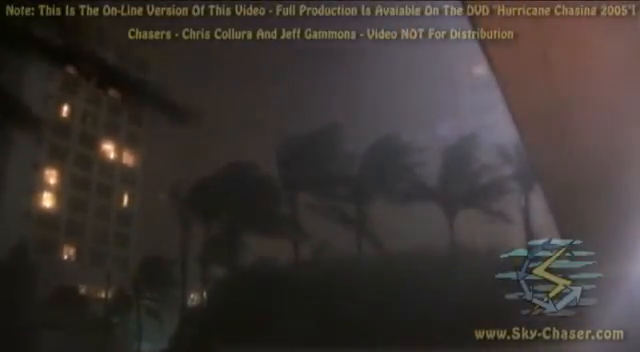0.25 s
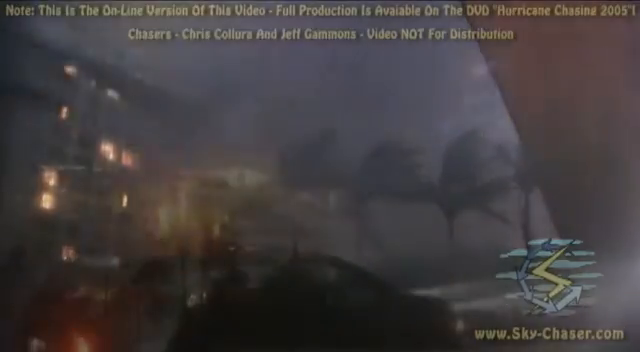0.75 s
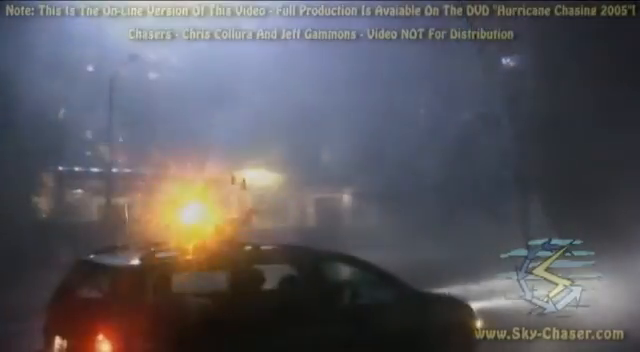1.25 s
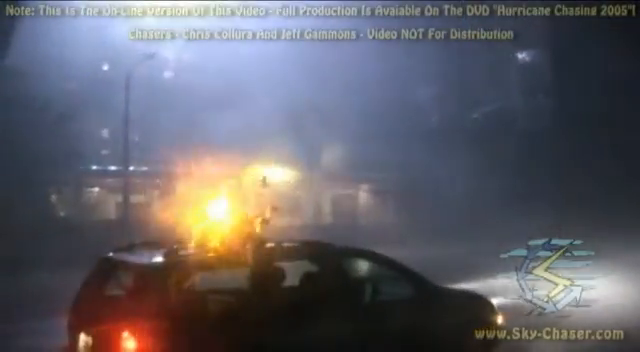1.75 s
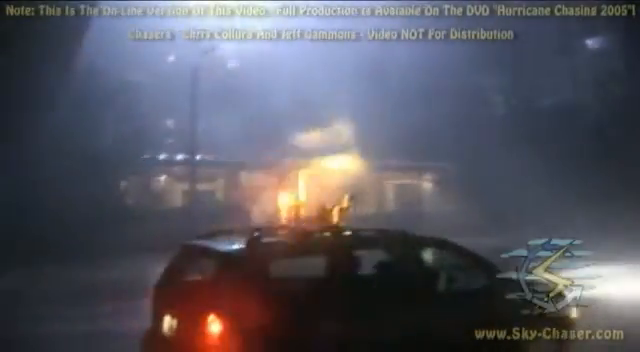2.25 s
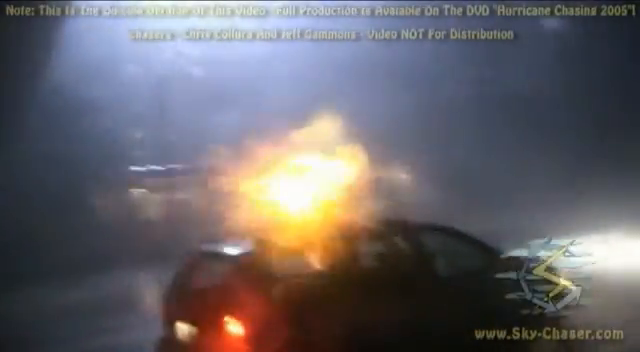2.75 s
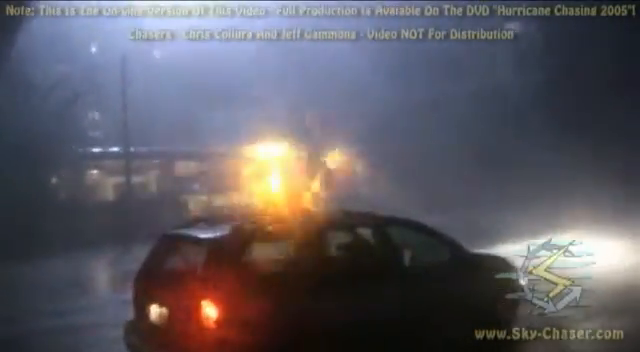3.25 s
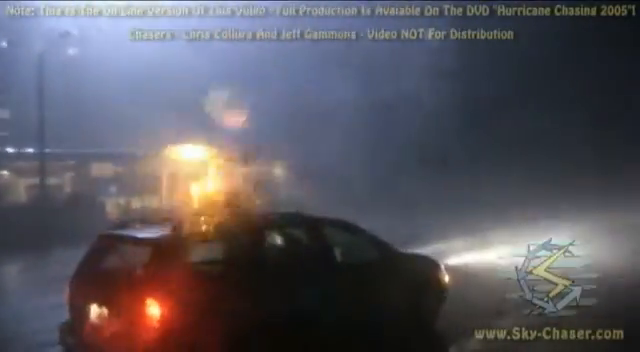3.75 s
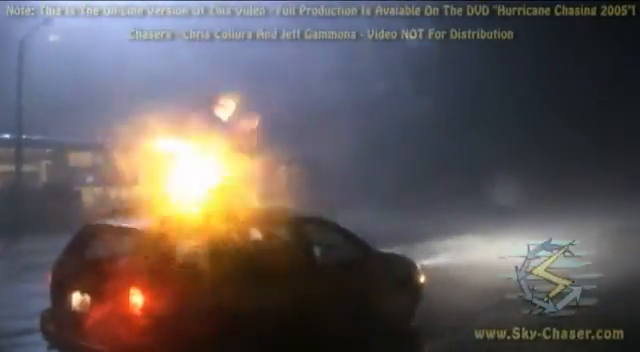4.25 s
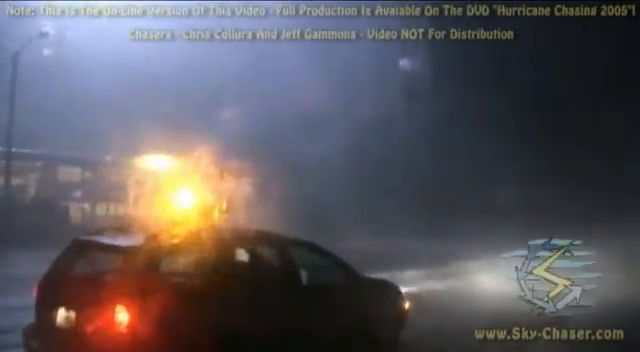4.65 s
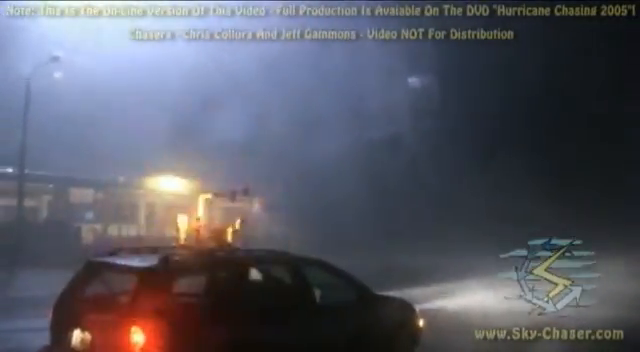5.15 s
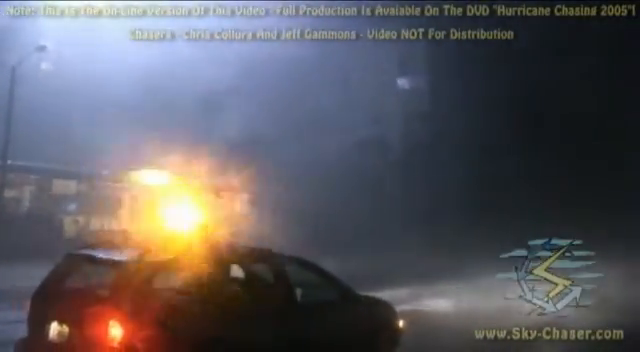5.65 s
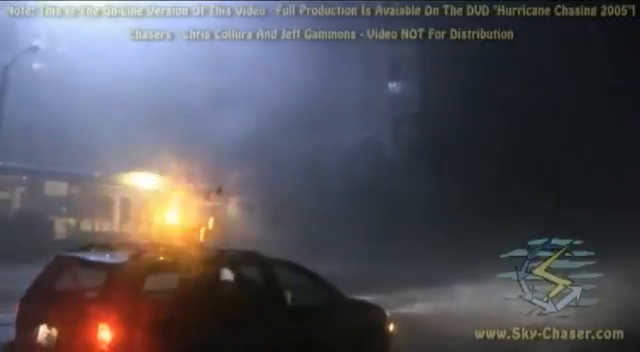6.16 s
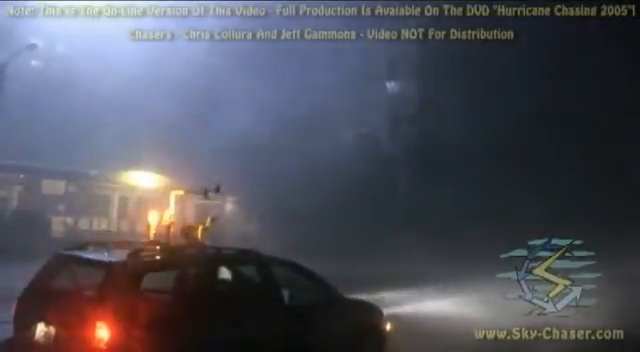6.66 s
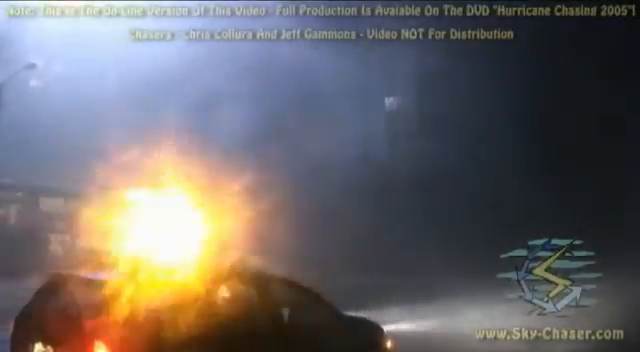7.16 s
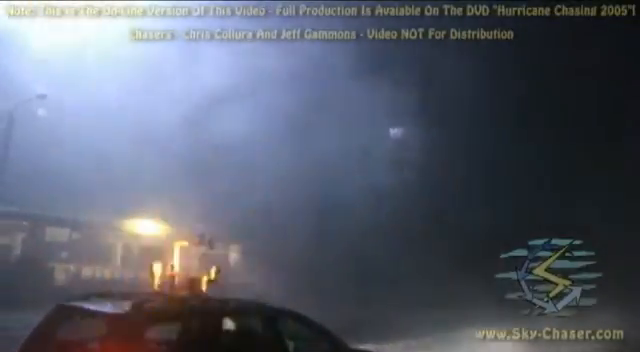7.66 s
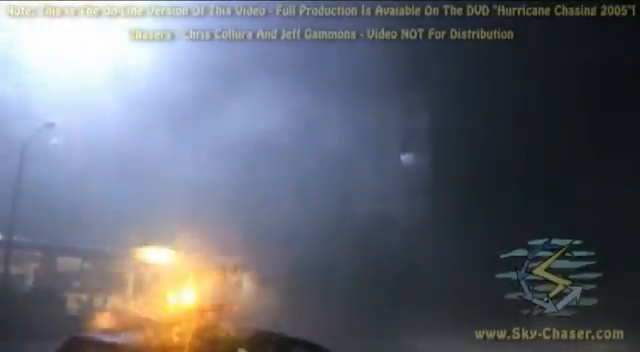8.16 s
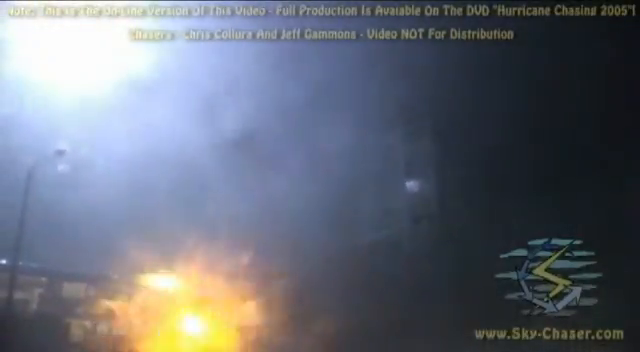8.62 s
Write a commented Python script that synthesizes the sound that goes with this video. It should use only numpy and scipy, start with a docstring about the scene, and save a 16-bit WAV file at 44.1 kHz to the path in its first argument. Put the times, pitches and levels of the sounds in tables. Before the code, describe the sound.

Outdoors in a street at night, a hurricane is heard from a sheltered spot for about 8.9 seconds. A dense wash of roaring wind, hissing rain and fine fizzing spray never stops, spread wide in stereo, over low uneven microphone rumble. Thumps and a brief whoosh come in the first 0.3 s, then it eases slightly. Deep buffets cluster around 1.5-1.8 s and again at 2.6 s, with small flutters and faint drop ticks near 3.5 and 3.9 s. The wind dips near 4.2 s, then rises; one sharp, dry click cuts through at 5.1 s. Low rumble swells at 5.8 s. From 6.3 to 7.4 s a long gust roars and moans, with another click at 6.95 s, bright whooshes and heavy thumps at 7.2, 7.3 and 7.6 s. It drops sharply around 7.8 s, then a steady low moan and strong rain continue until the cut.

```python
"""Roaring wind, hissing rain and a low buffeting rumble from the start: a night hurricane in a street.
Heard from a sheltered spot; one long gust builds and drops away, short gusts whoosh and moan.
Roar, rain, spray and rumble are noise, coloured by spectrum and driven by one wind curve.
Drones, rushes and flurries are enveloped noise bands; thumps are gliding sines with ragged noise.
Large drops click close by: short cosine knocks with a noise splash."""
import sys
import numpy as np
from scipy import signal
from scipy.fft import rfft, irfft
from scipy.io import wavfile
from scipy.ndimage import uniform_filter1d

SR = 44100
rng = np.random.default_rng(int(sys.argv[2]) if len(sys.argv) > 2 else 0)


def inscribe(sig):
    """Save sig as 16-bit PCM at rate SR to the path in sys.argv[1].

    A 1-D sig is mono; a 2-D sig holds one channel per row.
    Samples are clipped to [-1, 1] before scaling.
    """
    pcm = np.round(np.clip(np.atleast_2d(sig).T, -1, 1) * 32767)
    wavfile.write(sys.argv[1], SR, pcm.astype(np.int16))


N = 392049
TIME_S = np.arange(N) / SR

# Relative noise spectra: f/Hz, density/dB per Hz
ROAR_SPECTRUM = [(60, -32), (125, 2.5), (165, 1), (250, 2), (330, 2.5), (430, -2.5), (600, -1), (780, -2),
                 (1080, -0.5), (1500, -12.5), (3000, -11.5), (8000, -80)]
RAIN_SPECTRUM = [(200, -12.5), (550, -8), (1000, -3), (1750, -0.3), (2300, -1.6), (2750, -5), (3250, -3),
                 (3650, -6), (4500, -8.5), (6000, -12.5), (7200, -76), (12000, -60)]
SPRAY_SPECTRUM = [(2000, -54), (3300, -9.5), (4200, -0.5), (4700, -3.5), (5100, 0.5), (5400, -2),
                  (5950, 3.5), (6500, -3.5), (7200, -14), (7900, -8.5), (8900, -6.5), (10100, -9),
                  (12500, -5), (16000, -7)]
BUFFET_SPECTRUM = [(8, -22), (25, -12), (50, -4), (78, -2), (104, -1.5), (128, -5.5), (155, -13),
                   (200, -13.5), (320, -17.5), (500, -21), (1500, -72)]
BLAST_SPECTRUM = [(60, -26), (160, -15), (235, -2), (330, -17), (450, -20), (1500, -58)]
# Left-right correlation of the two ports, negative = opposite phase: f/Hz, correlation/-1 to 1
PORT_CORRELATION = [(100, .86), (280, .89), (550, .78), (2700, .73), (3300, .92), (3650, .56), (4000, .03),
                    (4400, -.48), (4700, -.52), (5150, .1), (5600, -.74), (6050, -.68), (6400, -.92),
                    (7000, -.92), (7500, -.67), (8800, -.44), (9300, -.68), (9900, .4), (10500, .78),
                    (12200, .2), (13400, .02), (14500, .28), (15500, -.1)]
# Wind strength relative to a reference wind of 0 dB: t/s, level/dB
WIND_STRENGTH = [(0, -4.5), (0.45, -8.5), (1.9, -6), (2.3, -5), (2.95, -3.5), (3.5, -3), (4.2, -6.5),
                 (5.05, -0.5), (5.45, 1), (6.15, 1.5), (6.55, 6), (7.3, 6), (7.82, -2.5), (8.2, 1.5),
                 (8.89, 2)]
# Airstream swinging onto (+) or off (-) the microphone: middle/s, width at 1/e/s, level/dB
SWIRLS = [(.3, 0.077, 11), (.56, 0.45, -4), (1.63, 0.6, 7), (1.93, 0.32, -6), (2.65, 0.28, 3),
          (3.1, 0.55, -10), (3.4, 0.17, -6), (3.67, 0.17, -20), (3.88, .16, 3.5), (4.9, 0.96, -2.5),
          (5.78, 0.19, 4.5), (6.2, .45, -1.5), (6.6, 0.43, -1), (7.61, .06, 3), (7.88, 0.25, -3.5),
          (8.15, 0.53, -4.5), (8.6, 0.43, -0.5)]
# Sheets of water sweeping past (+), gaps (-): middle/s, width at 1/e/s, rain level/dB, spray level/dB
SHEETS = [(.07, 0.11, 3, 2), (.24, .14, 1, 0), (.76, 0.2, 1.5, 2.5), (2.1, 0.097, 1, 1.5),
          (2.65, 0.27, .4, 1), (3.85, 0.84, 0.5, 1.7), (4.4, 0.61, 1.5, 3), (5.1, .16, -1, -1),
          (6.45, 0.65, 0.5, 1.5), (6.96, 0.08, 0, 1), (7.28, 0.28, 0.5, 1)]
# Sustained gusts: start/s, length/s, level/dB, f/Hz, half-width/octaves
DRONES = [(6.22, 1.23, -35, 111, .45), (8, 0.95, -36, 110, 0.37), (0, 3.6, -51, 338, .17),
          (3.8, 2.56, -45.5, 260, 0.23), (6.4, 1.02, -40, 243, 0.18)]
# Short whooshing gusts: middle/s, half-span/s, level/dB, f/Hz
RUSHES = [(.08, 0.13, -38, 1700), (2.6, 0.42, -47, 600), (4.45, 0.37, -40, 1800), (5.55, 0.56, -39, 750),
          (6.96, .08, -32, 2000), (7.17, .25, -36, 2300), (7.34, 0.11, -33.5, 2100)]
# Flurries of eddies: middle/s, half-span/s, level/dB, f/Hz
FLURRIES = [(0.85, 0.8, -46, 125), (1.649, .16, -40, 155), (2.1, 0.51, -50, 75), (2.302, 0.31, -45, 328),
            (2.63, 0.29, -41, 208), (3.251, 0.1, -39, 190), (3.3, 0.43, -49, 45), (3.499, 0.31, -49, 280),
            (3.847, .12, -45, 230), (4.218, 0.15, -44, 238), (4.48, .16, -48, 55), (4.76, .18, -45, 52),
            (4.98, 0.15, -44, 55), (5.22, 0.19, -42, 76), (5.5, 0.15, -41, 50), (5.78, .26, -35, 47.9),
            (6.38, .16, -39, 70), (6.67, .2, -41, 52), (6.85, 0.85, -39, 260), (7.24, .3, -38, 205),
            (7.47, .16, -40, 110), (7.62, 0.067, -34, 175), (8.52, 0.19, -37, 55)]
# Eddies striking the microphone: t/s, level/dB, length before release/s, mid-glide f/Hz
THUMPS = [(0.068, -27.5, 0.031, 123), (0.283, -23, .016, 96), (.314, -25.5, 0.023, 108),
          (1.477, -29.5, .022, 70), (1.553, -27.5, 0.02, 75), (1.622, -25, 0.036, 80),
          (1.737, -29.5, 0.038, 58), (2.1, -34, 0.032, 115), (2.573, -25.5, 0.022, 85),
          (2.717, -33, .05, 175), (2.936, -36, 0.02, 101), (3.232, -35, 0.028, 80),
          (3.508, -27, 0.014, 298), (3.815, -31, 0.029, 70), (5.766, -26, 0.046, 70), (5.945, -31, .02, 89),
          (6.935, -23, .035, 110), (7.157, -26, 0.015, 520), (7.299, -20.5, 0.052, 109),
          (7.598, -19, 0.05, 90)]
# Large drops on hard surfaces nearby: t/s, knock level/dB, f/Hz
CLICKS = [(.214, -27, 5070), (.708, -28, 1700), (3.514, -24, 1800), (3.916, -29, 2000), (5.1402, -16, 1950),
          (6.9475, -19, 1700)]

# Layer level at 0 dB wind [dB], and rise [dB per dB of wind]
ROAR_DB, ROAR_RISE_DB_PER_DB = -35, 0.57
RAIN_DB, RAIN_RISE_DB_PER_DB = -29, 0.26
SPRAY_DB, SPRAY_RISE_DB_PER_DB = -34, 0.34
BUFFET_DB, BUFFET_RISE_DB_PER_DB = -38.5, 1.06
SPRAY_BUILD_DB_PER_S = 0.07
# Fractions of the swirl dB and sheet rain dB that the roar follows
SWIRL_ROAR_SHARE, SHEET_ROAR_SHARE = 0.21, 0.39
THUMP_GLIDE_OCTAVES = 0.58
EDGE_HZ = 15750


def gain_of(db):
    """Decibels to amplitude."""
    return 10 ** (np.asarray(db) / 20)


def evened(x):
    """Scales to an rms of 1."""
    return x / np.sqrt(np.mean(x ** 2) + 1e-20)


def smoothed(x, size, axis=-1):
    """Moving average over a whole number of points."""
    return uniform_filter1d(x, size, axis=axis)


def read(points, hz):
    """Interpolates a table on a log-frequency axis."""
    f, value = np.transpose(points)
    return np.interp(np.log(hz + 1), np.log(f + 1), value)


def add(mix, start_s, sound):
    """Adds a mono or stereo sound to both channels, cut at the end of the mix."""
    part = mix[:, max(round(start_s * SR), 0):][:, :sound.shape[-1]]
    part += sound[..., :part.shape[1]]


def wind_db(ease_s=0.092):
    """Wind strength per sample, corners rounded by a moving average."""
    strength = np.interp(TIME_S, *np.transpose(WIND_STRENGTH))
    return smoothed(strength, max(round(ease_s * SR), 1))


def swells_db(rows, column=0):
    """Sum of Gaussian rises and dips per sample, from one dB column."""
    return sum(db[column] * np.exp(-(2 * (TIME_S - middle_s) / width_s) ** 2)
               for middle_s, width_s, *db in rows)


def at_ports(pair, spectrum):
    """Colours two unrelated signals and correlates them between the ports by mid-side mixing."""
    hz = np.fft.rfftfreq(N, 1 / SR)
    same = read(PORT_CORRELATION, hz)
    coloured = rfft(pair) * gain_of(read(spectrum, hz))
    mid, side = coloured * np.sqrt([1 + same, 1 - same])
    return evened(irfft([mid + side, mid - side], N))


def turbulent(patch_db, patch_hz, patch_s, flutter_db):
    """Two noises sharing random time-frequency patches and a broadband flutter."""
    hz, t, cells = signal.stft(rng.standard_normal((2, N)), SR, nperseg=512)
    frames = max(round(patch_s / t[1]), 1)
    bins = max(round(patch_hz / hz[1]), 1)
    grain = smoothed(rng.standard_normal(cells.shape[1:]), frames, axis=1)
    patches = evened(smoothed(grain, bins, axis=0))
    flutter = evened(smoothed(rng.standard_normal(len(t)), frames))
    swelling = gain_of(patch_db * patches + flutter_db * flutter)
    return signal.istft(cells * swelling, SR)[1][:, :N]


def impacts(per_s, spread_db):
    """Drops as random-sign impulses at random times, most small and a few large."""
    size = gain_of(spread_db * np.minimum(rng.exponential(1, (2, N)), 5))
    sign = rng.choice([-1, 1], (2, N))
    landed = rng.random((2, N)) < per_s / SR
    return evened(size * sign * landed)


def unbroken(air, steady_s=.035):
    """Evens out gaps and peaks of a noise, as in a flow that keeps pressing."""
    power = abs(smoothed((air ** 2).mean(0), max(round(steady_s * SR), 1))) + 1e-12
    return evened(air / np.cbrt(power))


def eddies(length_s, hz, octaves, steady_s=0.036):
    """Steadied noise band, log-Gaussian about one pitch, correlated as the ports are at that pitch."""
    size = SR * int(length_s + 1.5)
    f = np.fft.rfftfreq(size, 1 / SR)
    band = np.exp(-(np.log2((f + 1) / hz) / octaves) ** 2)
    noise = irfft(rfft(rng.standard_normal((2, size))) * band)
    same = read(PORT_CORRELATION, hz)
    mid, side = noise * np.sqrt([[1 + same], [1 - same]])
    pair = np.array([mid + side, mid - side])
    return unbroken(pair, steady_s)[:, :round(length_s * SR)]


def passing(rows, octaves):
    """Noise bands that swell and fade under squared Hann windows, one per table row."""
    out = np.zeros((2, N))
    for middle_s, half_span_s, db, hz in rows:
        air = eddies(2 * half_span_s, hz, octaves)
        swell = gain_of(db) * signal.windows.hann(air.shape[1]) ** 2 * air
        before_start = max(round((half_span_s - middle_s) * SR), 0)
        add(out, middle_s - half_span_s, swell[:, before_start:])
    return out


def roar():
    """Wind tearing through trees and around buildings: turbulent noise that follows the wind."""
    gusts_db = ROAR_RISE_DB_PER_DB * wind_db() + SWIRL_ROAR_SHARE * swells_db(SWIRLS)
    force = gain_of(ROAR_DB + gusts_db + SHEET_ROAR_SHARE * swells_db(SHEETS))
    air = turbulent(patch_db=1.14, patch_hz=220, patch_s=0.085, flutter_db=-0.4)
    return force * at_ports(air, ROAR_SPECTRUM)


def rain():
    """Far sheets merge into a noise wash; nearer drops spatter on the pavement as impulses."""
    wash = turbulent(patch_db=1.0, patch_hz=350, patch_s=0.03, flutter_db=0.25)
    spatter = gain_of(-6) * impacts(per_s=1500, spread_db=3.0)
    density = gain_of(RAIN_DB + RAIN_RISE_DB_PER_DB * wind_db() + swells_db(SHEETS))
    return density * at_ports(wash + spatter, RAIN_SPECTRUM)


def spray():
    """Wind-shredded droplets fizz above the rain: noise and dense impulses, slowly building."""
    build_db = SPRAY_BUILD_DB_PER_S * (TIME_S - TIME_S.mean())
    gusts_db = SPRAY_RISE_DB_PER_DB * wind_db() + swells_db(SHEETS, column=1)
    density = gain_of(SPRAY_DB + gusts_db + build_db)
    mist = turbulent(patch_db=1.46, patch_hz=700, patch_s=.03, flutter_db=0.43)
    droplets = gain_of(-11.5) * impacts(per_s=7000, spread_db=2.0)
    return density * at_ports(mist + droplets, SPRAY_SPECTRUM)


def buffeting(strong_db=-29):
    """Air tumbling over the microphone: as force grows, a higher blast outgrows the low rumble."""
    force = gain_of(BUFFET_DB + BUFFET_RISE_DB_PER_DB * wind_db() + swells_db(SWIRLS))
    tumbling = turbulent(patch_db=0.0, patch_hz=200, patch_s=0.045, flutter_db=0.5)
    air = at_ports(tumbling, BUFFET_SPECTRUM)
    rumble = gain_of(1.5) * unbroken(air, steady_s=0.054)
    blast = gain_of(-6.5) * at_ports(rng.standard_normal((2, N)), BLAST_SPECTRUM)
    blast_share = (force / gain_of(strong_db)) ** 0.5
    return force * (rumble + blast * blast_share)


def drones(build_s=0.32, drop_s=0.14):
    """Eddies shed by sustained gusts: steady noise bands that build, hold and drop linearly."""
    out = np.zeros((2, N))
    for start_s, length_s, db, hz, octaves in DRONES:
        air = eddies(length_s, hz, octaves, steady_s=.022)
        t = np.arange(air.shape[1]) / SR
        ramps = np.minimum(t / build_s, (length_s - t) / drop_s)
        add(out, start_s, gain_of(db) * np.minimum(ramps, 1) * air)
    return out


def rushes():
    """Short gusts whoosh through the palms and the rain: swelling noise bands."""
    return passing(RUSHES, octaves=0.58)


def flurries():
    """Eddies flutter past the microphone, large ones deep, small ones higher: swelling noise bands."""
    return passing(FLURRIES, octaves=0.53)


def thumps(rise_s=.004, fade_db=4, release_s=0.003, ragged=0.38, octaves=0.9):
    """An eddy hits fast as an uneven sine gliding up as it breaks up, mixed with a ragged noise wake."""
    out = np.zeros((2, N))
    noise_share = np.clip(ragged, 0, 1)
    for start_s, db, length_s, hz in THUMPS:
        wake = eddies(length_s + 10 * release_s, hz, octaves, steady_s=.015)
        t = np.arange(wake.shape[1]) / SR
        progress = np.minimum(t / length_s, 1)
        wobble = evened(smoothed(rng.standard_normal(SR), 150))[:len(t)]
        pitch_hz = hz * 2 ** (THUMP_GLIDE_OCTAVES * (progress - .5)) * (1 + 0.26 * wobble)
        cycles = np.cumsum(pitch_hz) / SR
        tone = np.sqrt(1 - noise_share) * np.sin(2 * np.pi * cycles)
        pressure = tone + np.sqrt(noise_share / 2) * wake
        attack = 1 - np.exp(-(t / rise_s) ** 2)
        release = np.exp(-np.maximum(t - length_s, 0) / release_s)
        shape = attack * gain_of(-fade_db * progress) * release
        add(out, start_s, gain_of(db) * shape * pressure)
    return out


def clicks(ring_s=0.0009, splash_db=-11, splash_s=0.002):
    """A large drop gives a Gaussian-windowed cosine knock and a brief, broad noise splash."""
    out = np.zeros((2, N))
    t = np.arange(-300, 600) / SR  # 0 = knock centre
    for centre_s, db, hz in CLICKS:
        knock = np.exp(-(t / ring_s) ** 2) * np.cos(2 * np.pi * hz * t)
        water = eddies(.1, hz, octaves=1.3)[:, :len(t)]
        splash = gain_of(splash_db) * (t > -ring_s) * np.exp(-abs(t) / splash_s) * water
        add(out, centre_s + t[0], gain_of(db) * (knock + splash))
    return out


def scene(left_db=0.07):
    """Wind and water together, the water raised on the left and lowered on the right by left_db."""
    water = (rain() + spray() + clicks()) * gain_of([[left_db], [-left_db]])
    gusts = drones() + rushes() + flurries() + thumps()
    return roar() + water + buffeting() + gusts


def record(dry):
    """The recorder's steep band limit: a linear-phase FIR low-pass."""
    low_pass = signal.firwin(1023, EDGE_HZ, window=("kaiser", 9), fs=SR)
    return signal.oaconvolve(dry, low_pass[None], "same")


dry = scene()
out = record(dry)
inscribe(out)
```